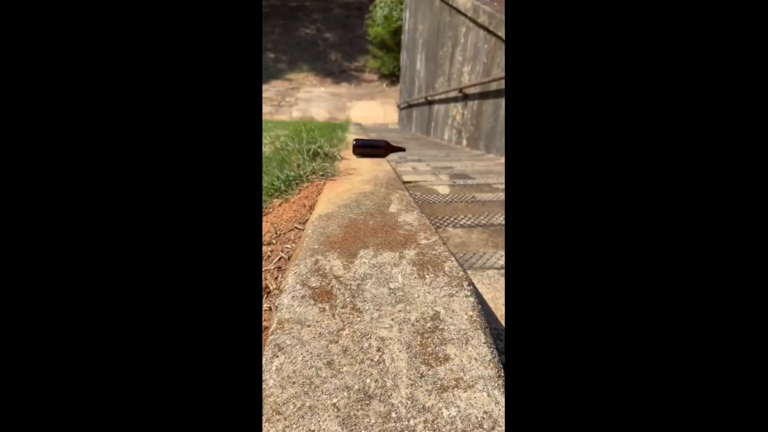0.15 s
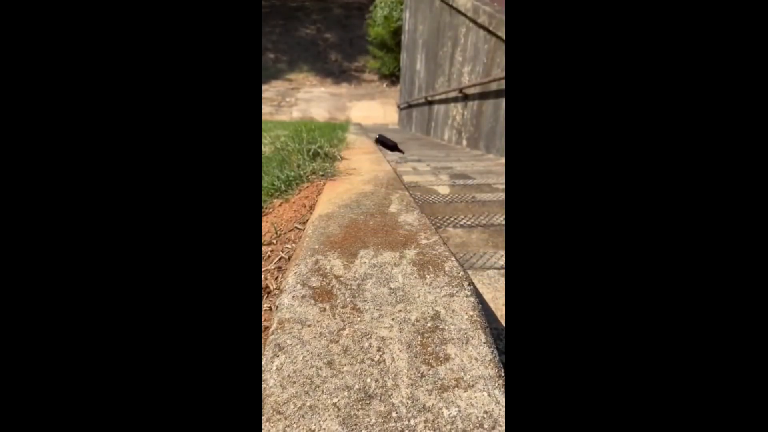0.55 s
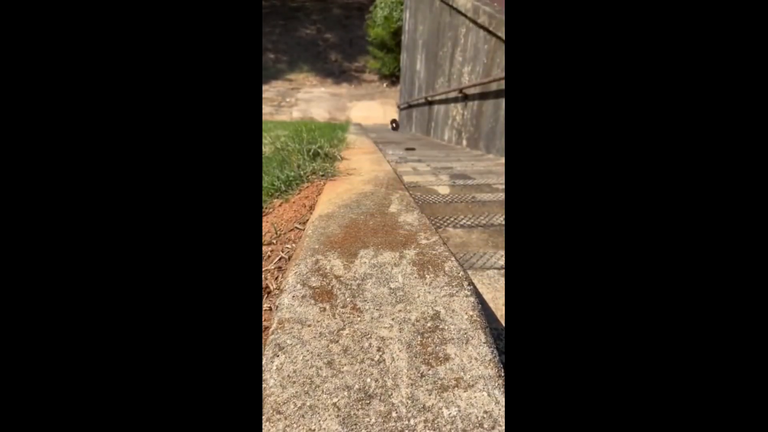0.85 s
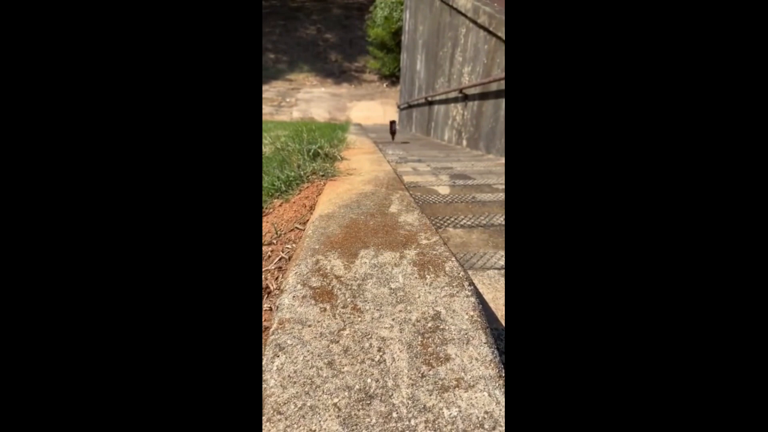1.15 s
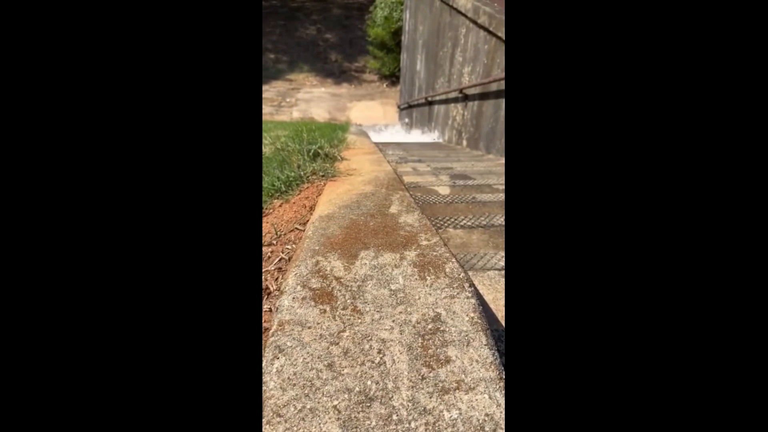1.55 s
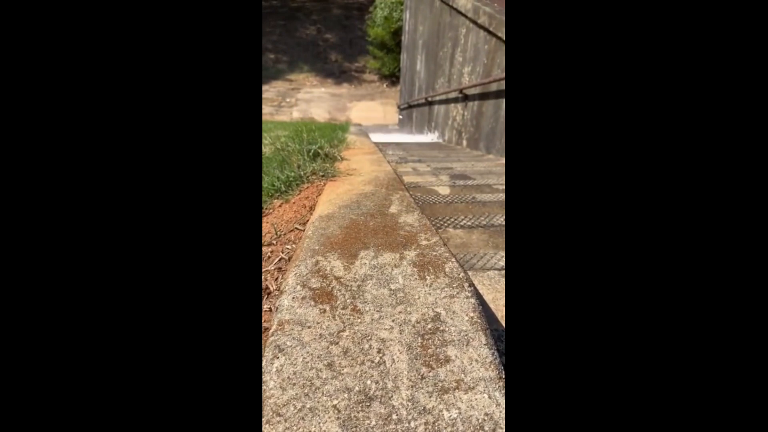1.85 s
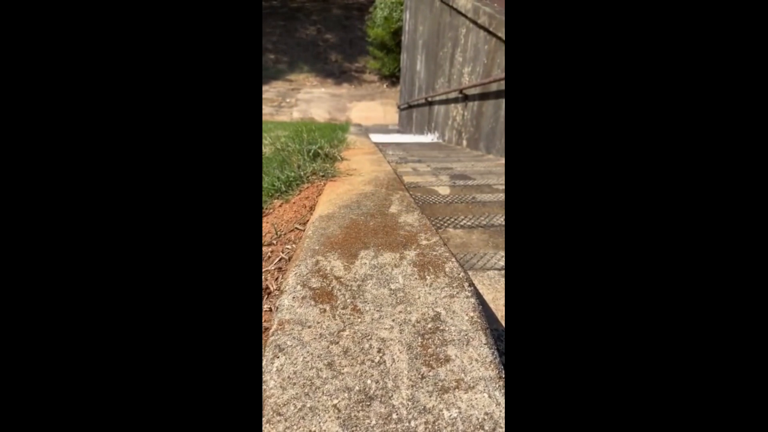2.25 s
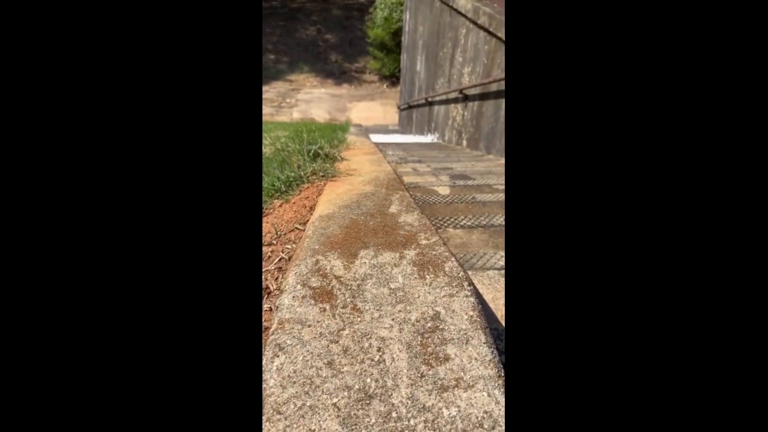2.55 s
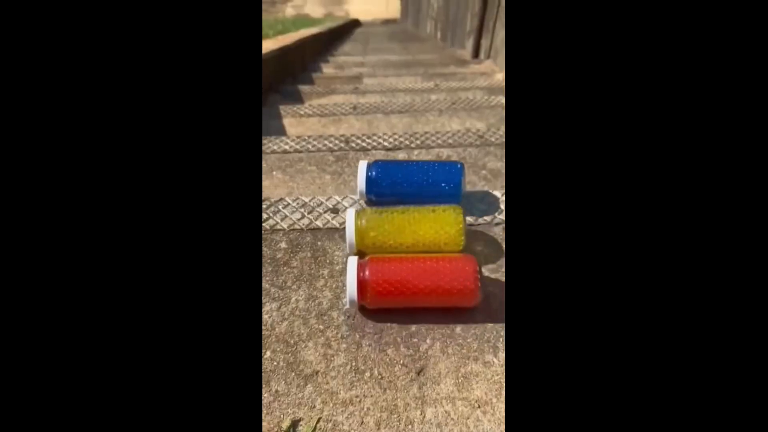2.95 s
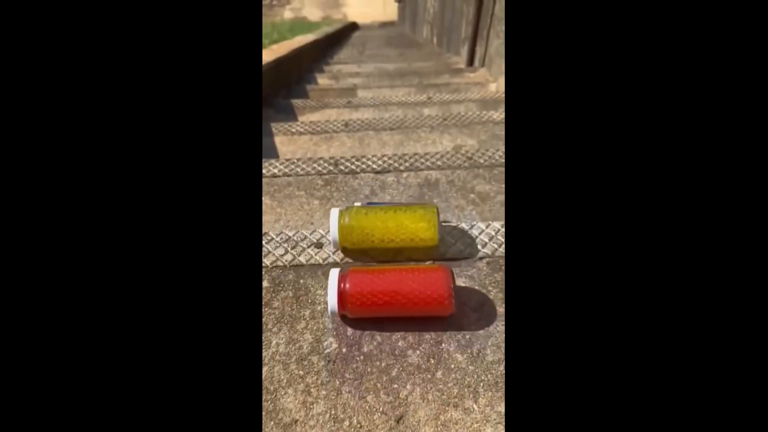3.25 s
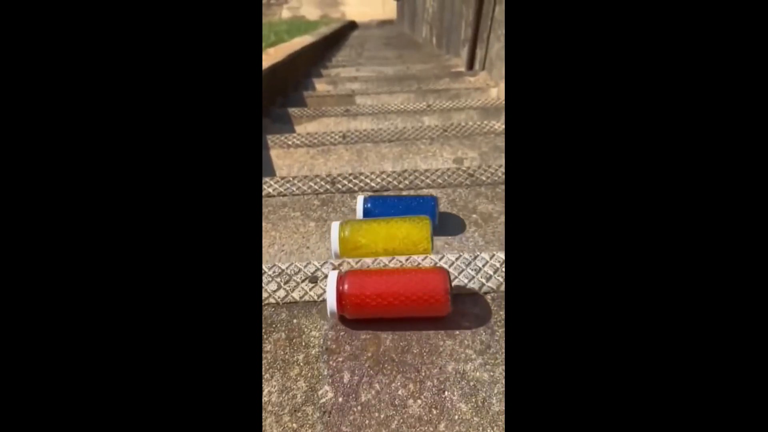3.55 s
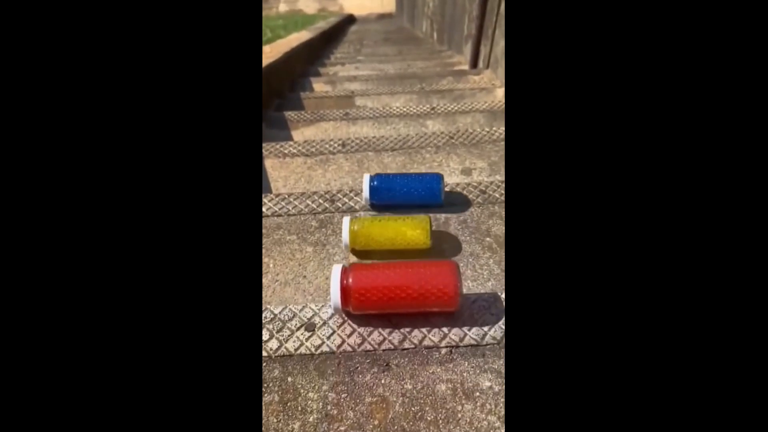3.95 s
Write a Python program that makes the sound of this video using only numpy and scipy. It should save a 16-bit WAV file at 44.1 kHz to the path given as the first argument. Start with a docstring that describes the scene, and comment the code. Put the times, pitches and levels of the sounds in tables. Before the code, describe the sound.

Mono, outdoors on concrete stairs, with a short diffuse echo, a faint hush and low lumpy rumble around the hits. From 0 to 0.45 s, the dull, faint tail of an earlier splash with a few glass ticks. At 0.55, 0.62 and 0.69 s a full glass bottle knocks on steps: muted, hollow tones around 400 Hz, roughened by sloshing. Near-quiet follows. At 1.17 s it bursts with a loud, clipped, low pop sinking in pitch and a noisy crack. Liquid spatters and splinters tick; glass clinks at 1.47 and 1.54 s, with a sharp piece at 2.05 s. From 2.1 to 2.65 s the thick base strikes repeatedly, ringing brightly around 1.2 kHz and above, swelling as it tumbles amid hissy skids. At 2.66 s heavy full jars abruptly begin rolling, a dry gritty rattle with knocks; hard clacking drops land around 3.18 and 3.6 s, a lighter one at 3.68, then rolling fades by 4.1 s.

```python
"""A full glass bottle bounces three times on concrete steps and bursts: damped modes, noise cracks, a sinking pop.
Liquid and shards scatter as dense grains and single rings; the thick base tumbles on, its modes swelling.
Full jars then roll over rough concrete and drop from step to step: random taps excite body and wall modes.
The last of an earlier splash opens the scene. A short diffuse echo, a faint hush and a low lumpy rumble
that swells around the hits lie behind. The sound is mono, with the same signal in both channels."""
import sys
import numpy as np
from scipy import signal
from scipy.fft import rfft, irfft
from scipy.io import wavfile
from scipy.ndimage import uniform_filter1d

SR = 44100
rng = np.random.default_rng(int(sys.argv[2]) if len(sys.argv) > 2 else 0)


def master_out(mix):
    """Clip the mix to full scale and print it as 16-bit PCM to the path in sys.argv[1]."""
    frames = np.transpose(np.atleast_2d(mix))
    ceiling = np.clip(frames, -1, 1)
    pcm = np.round(ceiling * 32767).astype(np.int16)
    wavfile.write(sys.argv[1], SR, pcm)


N = 180633

# single drops and splinters: start_s, peak_db, pitch_hz, t60_s, crack_db (relative to the peak)
SPLINTERS = [(0.0418, -29, 3270, 0.062, -10), (0.064, -21.5, 3880, 0.017, -7.5),
             (0.0914, -37.5, 1404, 0.071, -2), (0.1308, -27.5, 1630, 0.16, -30),
             (0.1431, -30, 4260, 0.031, -2), (0.1544, -35.5, 825, 0.22, -6), (0.1994, -39, 1282, 0.18, -17),
             (0.2289, -26.5, 1518, 0.1, -23), (0.2455, -33, 3600, 0.045, -20),
             (0.307, -40.5, 1450, 0.079, -23), (0.376, -41, 2860, 0.071, -26),
             (0.414, -38.5, 3940, 0.054, -22), (1.2313, -17.5, 3010, 0.044, 0.5),
             (1.2424, -20, 1057, 0.18, -24), (1.282, -24, 1730, 0.061, -17),
             (1.3602, -28, 1980, 0.041, -14), (1.3725, -20, 2044, 0.032, -26),
             (1.4248, -30, 1777, 0.22, -27), (1.4361, -24, 3500, 0.031, -23.5),
             (1.545, -20, 5990, 0.07, -11), (1.6558, -16, 2574, 0.04, -1), (1.6594, -15.5, 1146, 0.018, 4),
             (1.6785, -28, 6020, 0.049, 6), (1.7075, -21, 3570, 0.018, -5), (1.7434, -24, 1846, 0.036, 4),
             (1.7673, -25.5, 2470, 0.072, 1), (1.8178, -28, 1270, 0.03, 13), (1.8416, -31, 2570, 0.15, 11),
             (1.8704, -20.5, 7095, 0.047, 3.5), (1.979, -28, 1300, 0.045, 14.5),
             (1.9975, -31.5, 1113, 0.033, 6), (2.0098, -24, 2780, 0.082, 1),
             (2.0463, -2.5, 1520, 0.036, -8), (2.3594, -29.5, 1220, 0.074, 13.5),
             (2.425, -24, 6220, 0.05, -7.5)]


def amp(db):
    """Level law: 20 dB is a factor of ten in amplitude."""
    return 10 ** (np.asarray(db) / 20)


def evened(x):
    """Normalisation to unit effective (rms) value."""
    return x / np.sqrt(np.mean(x ** 2) + 1e-20)


def peaked(x):
    """Normalisation to unit peak."""
    return x / (abs(x).max() + 1e-20)


def add(mix, s, sound):
    """Superposition: a sound is summed into the mix from time s on."""
    part = mix[round(s * SR):][:len(sound)]
    part += sound[:len(part)]


def ring(modes, size=8000):
    """Modal decay: dying sines from (Hz, dB, t60 s) rows, each swelling over about its first cycle."""
    hz, db, t60 = np.transpose(modes)[:, :, None]
    t = np.arange(size) / SR
    decay = amp(db - 60 * t / t60)
    onset = np.minimum(hz * t * 0.89, 1)
    return (decay * np.sin(2 * np.pi * hz * t) * onset).sum(0)


def puff(t60, size=4000, rise=0.00079):
    """Broadband impact: noise with a linear rise and exponential decay, both in seconds."""
    t = np.arange(size) / SR
    return rng.standard_normal(size) * amp(-60 * t / t60) * np.minimum(t / rise, 1)


def colour(x, points):
    """Spectral shaping: a filter drawn through (Hz, dB) points on a logarithmic frequency axis."""
    f, db = np.transpose(points)
    bins_hz = np.fft.rfftfreq(len(x), 1 / SR)
    gain = amp(np.interp(np.log(bins_hz + 1), np.log(f + 1), db))
    return irfft(rfft(x) * gain, len(x))


def band(x, lo_hz, hi_hz):
    """Band limitation by a Butterworth filter."""
    return signal.sosfilt(signal.butter(2, [lo_hz, hi_hz], "bandpass", fs=SR, output="sos"), x)


def highpass(x, hz):
    """First-order loss of bass below a corner frequency."""
    return signal.sosfilt(signal.butter(1, hz, "highpass", fs=SR, output="sos"), x)


def follow(rows):
    """Level envelopes: gains over the whole scene from dB columns, -120 dB outside the rows."""
    s, *columns = np.transpose(rows)
    t = np.arange(N) / SR
    return [amp(np.interp(t, s, c, -120, -120)) for c in columns]


def dying(s, db, t60, rise):
    """Exponential decay: a gain over the whole scene that rises at s and dies away."""
    t = np.maximum(np.arange(N) / SR - s, 0)
    return amp(db - 60 * t / t60) * np.minimum(t / rise, 1)


def clicks(per_s, spread_db):
    """Random impulse train: sparse clicks of either sign, a few of them large."""
    sizes = amp(spread_db * np.minimum(rng.exponential(1, N), 5))
    return sizes * (rng.random(N) < per_s / SR) * rng.choice([-1, 1], N)


def flutter(size, span):
    """Low-frequency modulation: slow random wobble, rms about 1, from averages span samples long."""
    noise = rng.standard_normal(size + span)
    return evened(uniform_filter1d(uniform_filter1d(noise, span), span))[:size]


def bounces():
    """Impact excitation of damped modes: each bounce stops the old ringing of the full bottle.

    The sloshing inside roughens the tones and finally chokes them."""
    # the bottle meets a step: start_s, main_peak_db, upper_peak_db, crack_peak_db, thud_db, thud_hz,
    # thud_t60_s, damping_factor (divides t60 of the main tones)
    falls = [(0.547, -26, -30, -18, -24.5, 388, 0.071, 0.76),
             (0.618, -19, -30.5, -30, -27.5, 395, 0.26, 1.4), (.693, -25, -32, -32, -10.5, 606, 0.022, 1.7)]
    # main modes of the full bottle: pitch_hz, relative_db, t60_s (before damping)
    main_modes = [(430.5, -2.5, 0.64), (405, -3, 0.16), (325, -21, 0.58)]
    # upper modes of the full bottle: pitch_hz, relative_db, t60_s
    upper_modes = [(542, -8.5, 0.35), (650, -9.5, 0.25), (650, -9, .3), (704, -11.5, 0.36),
                   (750, -0.5, 0.6), (752, -7.5, 0.37), (807, -8.5, 0.72), (846, 1.5, 0.21),
                   (937, -2.5, 0.33)]
    out = np.zeros(N)
    stops = [row[0] for row in falls[1:]] + [1.0]
    for (s, main_db, upper_db, crack_db, thud_db, hz, thud_t60, damping), stop in zip(falls, stops):
        size = int((stop - s) * SR) + 300
        fade = np.clip((size - np.arange(size)) / (0.3 * size), 0, 1)
        main = peaked(ring([(f, db, t60 / damping) for f, db, t60 in main_modes], size=size))
        rough_main = main * (1 + 0.35 * flutter(size, span=600))
        upper = sum(ring([mode], size=size) * (0.94 + flutter(size, span=400)) for mode in upper_modes)
        add(out, s, fade * (amp(main_db) * rough_main + amp(upper_db) * peaked(upper)))
        add(out, s, amp(thud_db) * ring([(hz, 0, thud_t60), (hz * 0.68, -12, thud_t60)]))
        crack = puff(0.041, size=9000, rise=0.0031)
        crack += 0.087 * puff(0.28, size=9000, rise=0.0062)  # the slow part comes back off the stairs
        add(out, s, amp(crack_db) * peaked(band(crack, 610, 3000)))
    return out


def burst():
    """Sudden release and overload: the walls give way, the liquid pops out and the peaks are clipped."""
    # modes of the ringing broken halves: pitch_hz, relative_db, t60_s
    half_modes = [(436, 4.5, 0.17), (525.4, -3.5, 0.083), (680, 4.5, 0.076), (706, -2, .06),
                  (319, -4, 0.17)]
    pop_s, hold_s = 1.1704, 0.0236
    # levels ahead of the clipping
    pop_db, sag_db, tail_db, tail_t60_s = -1, -6.5, -16, 0.11
    from_hz, to_hz, sink_s = 325, 188.3, 0.0201
    halves_db, crack_peak_db, clip_level = -7.5, -10, 0.4
    t, out = np.arange(8000) / SR, np.zeros(N)
    pitch_hz = to_hz + (from_hz - to_hz) * np.exp(-t / sink_s)
    turns = np.cumsum(pitch_hz) / SR
    # full for a moment, then a weak tail
    full = amp(pop_db + sag_db * t / hold_s) * np.clip((hold_s - t) / 0.0013, 0, 1)
    tail = amp(tail_db - 60 * (t - hold_s) / tail_t60_s)
    add(out, pop_s, -np.maximum(full, tail) * np.sin(2 * np.pi * turns))
    halves = sum(ring([mode], size=12000) * (1.04 + flutter(12000, span=300)) for mode in half_modes)
    add(out, pop_s + 0.00605, amp(halves_db) * peaked(halves))
    out = np.clip(out, -clip_level, clip_level)  # the microphone overloads
    add(out, pop_s, amp(crack_peak_db) * peaked(band(puff(.1, size=8000), 510, 3700)))
    return highpass(out, 60)


def scatter():
    """Granular superposition: short grains, sharp ticks and tiny ringing chips over hiss; drops glide up."""
    # spectrum of the debris: frequency_hz, relative_db
    spray = [(120, -59.5), (200, -29.5), (353, -3), (440, -26), (696, -9.5), (933, -14), (1320, -5.5),
             (1710, -9), (2650, -5.5), (5420, -5), (6880, -1.5), (12600, 4), (16000, -41.5)]
    t = np.arange(3000) / SR
    grains = 1.4 * rng.standard_normal(N)
    grains += 1.2 * evened(clicks(900, spread_db=3.0))
    for hz in np.geomspace(400, 9000, num=30):
        turns = hz * t * (1 + 2.6 * t)  # rising pitch
        grain = np.sin(2 * np.pi * turns) * np.exp(-turns / rng.uniform(3.9, 14))
        grain *= 1 - np.exp(-turns / 0.28)
        grains += 0.39 * evened(signal.oaconvolve(clicks(60 + hz / 15, spread_db=4.5), grain)[:N])
        chip = ring([(hz * rng.uniform(0.94, 1.05), 0, .09)], size=3000)
        grains += 0.18 * evened(signal.oaconvolve(clicks(18, spread_db=5.5), chip)[:N])
    grains = colour(grains, spray)
    early = np.arange(N) < .5 * SR  # the first splash is farther off and duller
    grains = np.where(early, evened(band(grains, 600, 6500)), evened(grains))
    mid = evened(band(grains, 1010, 4800))
    top = evened(band(grains, 7900, 21800))
    low = evened(band(grains, 250, 1580))
    return spill(mid, top, low)


def spill(mid, top, low):
    """Envelope control: three bands of debris follow a slow level, with a shower after every splinter."""
    # two lists, the old splash and the burst bottle: start_s, level_db, treble_db (relative to the middle band)
    courses = [
        [(0.0, -43, -6), (0.05, -49.5, -10), (0.12, -49.5, -9), (0.26, -52.5, -10), (0.28, -70, -12),
         (0.35, -77.5, -11), (0.42, -58, -8), (0.47, -83.5, -7)],
        [(1.175, -23.5, -6.5), (1.21, -34.5, -21), (1.245, -31, -21), (1.28, -37.5, -8.5), (1.37, -35, -15.5),
         (1.41, -48.5, -15), (1.44, -29, -22), (1.62, -34, -6.5), (1.7, -37, -15), (1.86, -39.5, -8.5),
         (1.92, -36, -2), (1.965, -46.5, -17), (1.985, -43.5, 8.5), (2.085, -42, -22), (2.11, -27, -2.5),
         (2.28, -43, -2.5), (2.42, -37.5, -7.5), (2.54, -42, -7), (2.68, -38.5, -11)],
    ]
    low_shares_db = -3.5, -14.5  # one for each list, relative to the middle band
    shower_db, shower_t60_s, shower_rise_s = -17, 0.091, 0.0033  # dB relative to the splinter's peak
    showers = sum(dying(s, db + shower_db, shower_t60_s, shower_rise_s) for s, db, *_ in SPLINTERS)
    out = np.zeros(N)
    for rows, low_db in zip(courses, low_shares_db):
        level, treble = follow(rows)
        inside = treble > 1e-5  # showers sound only within the span of the rows
        out += (level + showers * inside) * (mid + treble * top + amp(low_db) * low)
    return out


def splinters():
    """Fragment impacts: each piece cracks and rings roughly around its pitch, as several pieces jostle.

    Dull lumps land as two damped modes; skids are banded noise."""
    # dull lumps landing: start_s, level_db, pitch_hz, t60_s
    lumps = [(1.349, -23, 237, 0.067), (1.468, -27.5, 500, 0.031), (1.657, -17.5, 242, 0.023),
             (1.914, -35.5, 356, 0.047)]
    # glass skids over grit and excites a dense cluster of modes:
    # start_s, rise_s, t60_s, peak_db, centre_hz, width_hz
    skids = [(1.867, 0.0017, 0.14, -18, 6880, 1210), (2.1, 0.0057, 0.24, -17, 7560, 1500),
             (2.131, 0.043, 0.18, -13, 8280, 800), (2.31, .025, 0.14, -29.5, 8100, 1196),
             (2.459, 0.017, 0.41, -16.5, 7100, 1800), (2.549, 0.027, 0.12, -10, 8060, 1100)]
    out = np.zeros(N)
    for s, db, hz, t60, crack_db in SPLINTERS:
        tone = ring([(hz, 0, t60), (hz * 1.9, -8, t60 * 1.1)], size=4000)
        tone = tone * (1.0 + flutter(4000, span=90))
        add(out, s, amp(db) * peaked(tone))
        spikes = amp(5.7 * rng.exponential(1, 4000).clip(0, 4))
        crack = band(puff(1.5 * t60) * spikes, 1100, 10000)
        add(out, s, amp(db + crack_db) * peaked(crack))
    for s, db, hz, t60 in lumps:
        add(out, s, amp(db) * ring([(hz, 0, t60), (hz * 2.4, -6, t60 * 0.44)]))
    for s, rise, t60, db, hz, width_hz in skids:
        edge = hz - width_hz / 2, hz + width_hz / 2
        skid = band(band(puff(t60, size=9000, rise=rise), *edge), *edge)
        add(out, s, amp(db) * peaked(skid))
    return out


def base():
    """Modal excitation and directivity: a blow stops the old ringing and starts a new one; tumbling fades modes."""
    # blows; the struck place sets six groups of modes:
    # start_s, crack_peak_db, group_1_db to group_6_db, damping_factor (divides t60)
    blows = [(1.4677, -16.5, -20, -17.5, -24, -14.5, -21.5, -44, 4.65),
             (1.544, -19.5, -19, -14.5, -25.5, -23, -24, -47, 2.4),
             (1.554, -23.5, -32, -24, -31.5, -25, -32, -52, 2.05),
             (2.0995, -13, -12, -15, -19.5, -30, -14.5, -22, 3.1),
             (2.1192, -13.5, -25.5, -31, -18, -34.5, -17.5, -34.5, 0.91),
             (2.2938, -12.5, -18.5, -26, -18.5, -25, -15.5, -22.5, 0.9),
             (2.4432, -12.5, -20, -16.5, -11.5, -41.5, -20.5, -24, 1.6),
             (2.4813, -16, -28, -27, -25.5, -35.5, -17, -29.5, 0.82),
             (2.5524, -19.5, -34.5, -28, -28, -28.5, -19.5, -21.5, 1.26),
             (2.577, -28, -37.5, -31, -46.5, -25, -20.5, -38, 1.17)]
    # modes of the base: pitch_hz, relative_db (added to the group's), t60_s (before damping)
    base_modes = [(1235.6, 0, 1), (2325, 3.5, 0.41), (2709, -0.5, 0.3), (4014, 3.5, 0.15), (4756, -2, 0.17),
                  (5150, -8, 0.16), (6650, -6, 0.23), (6790, 3.5, 0.089), (7510, -7.5, .2),
                  (7500, -7, 0.06), (8280, -4, 0.14), (7920, -1.5, 0.082), (10170, -15, 0.61),
                  (10700, -7, 0.19), (11500, -18.5, .1), (12350, -14.5, 0.3)]
    groups = [0, 1, 2, 3, 4, 4] + [5] * 10  # the group of each mode
    parts, cracks = np.zeros((6, N)), np.zeros(N)
    stops = [row[0] for row in blows[1:]] + [9]
    for (s, crack_db, *group_db, damping), stop in zip(blows, stops):
        size = int(min(stop - s, .3) * SR) + 100
        for (hz, db, t60), group in zip(base_modes, groups):
            tone = ring([(hz, db + group_db[group], t60 / damping)], size=size)
            depth_db = 2.5 + hz / 2200  # high modes beam narrowly
            turning = amp(depth_db * np.clip(flutter(size, span=500), -2, 1))
            add(parts[group], s, tone * turning * signal.windows.tukey(size, 240 / size))
        add(cracks, s, amp(crack_db) * peaked(band(puff(0.067, rise=0.0046), 600, 9400)))
    first, second = tumble()
    return first * parts[0] + second * (parts[1] + parts[2]) + parts[3:].sum(0) + cracks


def tumble():
    """Rotating directivity: the lowest mode swells between edge-on moments.

    The next two modes swell slightly earlier and less deeply."""
    # the face of the base is edge-on: start_s, swell_db (of the swell that follows)
    edge_on = [(1.44, 3), (1.529, -6), (1.6, -19), (2.04, -3.5), (2.117, -1), (2.2, 2.5), (2.354, 6.5),
               (2.434, 7.5), (2.577, 7)]
    stops_s, edge_leak, swell_shape = 2.68, 0.25, 0.95
    side_depth, side_peak = 0.15, 0.42  # peak position in half turns after edge-on
    s, db = np.transpose(edge_on)
    t = np.arange(N) / SR
    # the tiny offset keeps the last index inside the table
    half_turns = np.interp(t, [*s, stops_s], np.arange(len(s) + 1) - 1e-9) + 1e-9 * (t < stops_s)
    sounding = np.clip((stops_s - t) / .012, 0, 1)
    swell = abs(np.sin(np.pi * half_turns)) ** swell_shape
    face = amp(db)[half_turns.astype(int)] * swell + edge_leak
    side = 1 + side_depth * np.cos(2 * np.pi * (half_turns - side_peak))
    return face * sounding, side * sounding


def jar_body(hz):
    """Scaled modal series: the body modes of a full jar keep fixed ratios to its pitch."""
    # body modes: pitch_factor, relative_db, t60_s
    body_modes = [(0.98, 23, 0.0096), (0.39, -5, 0.022), (2.1, -9.5, 0.026), (.38, -16.5, 0.053)]
    return ring([(factor * hz, db, t60) for factor, db, t60 in body_modes], size=2500)


def jars():
    """Rolling and impact excitation: grit and bumps tap body and wall modes of the jars.

    The body pitch drifts as the contents shift."""
    # rolling: start_s, level_db (before the clumping of the grit), pitch_hz
    roll = [(2.66, -33, 1250), (2.76, -47, 1120), (2.885, -41, 970), (2.93, -51.5, 1030),
            (3.045, -44, 1246), (3.09, -45.5, 964), (3.14, -57, 1110), (3.23, -52.5, 1080),
            (3.285, -42, 1010), (3.335, -52.5, 920), (3.384, -50.5, 1210), (3.48, -47.5, 1080),
            (3.54, -44.5, 1320), (3.59, -57, 1130), (3.65, -44.5, 1250), (3.7, -44, 1350),
            (3.769, -62, 960), (3.816, -48, 1010), (3.97, -56, 783), (4.046, -55, 710), (4.096, -64.5, 800)]
    # modes of the glass wall: pitch_hz, relative_db, t60_s
    wall_modes = [(2725, 7.5, 0.029), (3440, -35, 0.011), (4340, 3.5, 0.02), (4960, -13, 0.00985),
                  (6970, 5.5, 0.0069), (8700, 1, 0.0041), (12630, 0.5, 0.0051)]
    # a jar meets a ridge or a step: start_s, body_peak_db, pitch_hz, bright_db (relative), rattle_t60_s
    bumps = [(2.662, -18, 1265, -22, 0.041), (2.697, -24, 1360, -13, 0.0056),
             (2.735, -31.5, 1240, -26, 0.0093), (2.773, -22, 1280, -40, 0.045),
             (2.797, -27.5, 860, -27, 0.061), (2.824, -26, 1264, -17, 0.062), (2.88, -30, 910, -10.5, 0.02),
             (2.941, -32.5, 1150, -12.5, 0.1), (2.995, -35, 1150, -0.5, 0.062),
             (3.028, -22, 1376, -24, 0.059), (3.037, -33, 790, -24.5, 0.048), (3.069, -28, 1110, -6, 0.015),
             (3.094, -26, 1120, -25, 0.01), (3.109, -34, 1060, -35, 0.017),
             (3.148, -27.5, 1040, -11, 0.078), (3.173, -13, 1045, -22, 0.015),
             (3.181, -15.5, 1384, -2, 0.031), (3.185, -8, 1520, -9.5, 0.011), (3.248, -36, 800, -8, 0.016),
             (3.281, -29, 1650, 2, 0.051), (3.327, -36.5, 890, -11, 0.028), (3.393, -37, 1500, -30, 0.019),
             (3.436, -34.5, 1184, -25, 0.019), (3.455, -34.5, 990, -9, 0.025),
             (3.53, -30.5, 1310, -10, 0.069), (3.542, -29, 1520, -5, 0.043), (3.567, -34, 1135, -10, 0.033),
             (3.598, -9.5, 1620, -2, 0.024), (3.603, -9.5, 1500, 0.5, 0.016),
             (3.61, -14.5, 1120, 0.5, 0.015), (3.67, -33, 1010, -3, 0.034),
             (3.683, -19, 1377, -12.5, 0.032), (3.694, -23.5, 1480, -15, 0.024),
             (3.823, -35, 1526, -19, 0.016)]
    # every bump shakes the step: pitch_hz, level_db (relative to the bump), t60_s
    step_modes = [(59, -24.5, 0.062), (194, -26, 0.038), (395, -21, 0.046)]
    bright_share_db, quiet_brighter = -11.5, 0.16  # wall share at -46 dB; its gain per dB the rumble drops
    clump_depth_db = 2.5  # grit lies in clumps
    # crack levels relative to the bump: light bumps, and drops whose body peaks above drop_from_db
    ridge_crack_db, drop_crack_db, drop_from_db = -13.5, -4, -12
    wall = ring(wall_modes, size=2000)
    grit = clicks(1600, spread_db=2.5) + 0.21 * rng.standard_normal(N)
    pitches = np.geomspace(600, 1700, num=8)
    rumbles = [evened(signal.oaconvolve(clicks(350, spread_db=4.0), jar_body(hz))[:N]) for hz in pitches]
    wall_hiss = evened(signal.oaconvolve(grit, wall)[:N])
    grit_hiss = evened(band(band(grit, 2200, 6600), 2200, 5900))
    sizzle = evened(wall_hiss + 0.25 * grit_hiss)
    s, db, hz = np.transpose(roll)
    level, bright = follow(np.transpose([s, db, bright_share_db - quiet_brighter * (db + 46)]))
    # crossfade between rumbles of fixed pitch to follow the drift
    pitch_now = np.interp(np.arange(N) / SR, s, hz)
    near = np.exp(-(np.log(pitch_now / pitches[:, None]) / 0.51) ** 2)
    rumble = (near * rumbles).sum(0) / np.sqrt((near ** 2).sum(0) + 1e-9)
    clumps_db = clump_depth_db * flutter(N, span=350)
    out = level * (amp(clumps_db) * rumble + amp(0.75 * clumps_db) * bright * sizzle)
    for s, db, hz, bright_db, rattle_t60 in bumps:
        taps = puff(rattle_t60, size=2500, rise=0.0011) * (rng.random(2500) < .15)
        dull = peaked(signal.oaconvolve(taps, jar_body(hz))[:4000])
        sharp = peaked(signal.oaconvolve(taps, wall)[:4000])
        crack = peaked(band(band(puff(rattle_t60 * 3.35), 430, 3850), 180, 11100))
        crack_db = np.interp(db, [drop_from_db - 2.5, drop_from_db], [ridge_crack_db, drop_crack_db])
        add(out, s, amp(db) * (dull + amp(bright_db) * sharp + amp(crack_db) * crack))
        add(out, s, amp(db) * ring(step_modes))
    return out


def echo(x):
    """Diffuse reverberation off wall and steps: a noise tail, each band dying at its own speed."""
    # decay of the tail: frequency_hz, t60_s
    wall_decay = [(200, 0.47), (1000, 0.14), (4000, 0.093), (12000, 0.025)]
    hz, t, z = signal.stft(rng.standard_normal(SR // 2), SR, nperseg=256)
    f, t60 = np.transpose(wall_decay)
    decay = amp(-60 * t / np.interp(hz, f, t60)[:, None])
    tail = signal.istft(z * decay, SR, nperseg=256)[1]
    return signal.oaconvolve(x, tail / np.linalg.norm(tail))[:N]


def air():
    """Filtered noise: a faint outdoor hush, and a low lumpy rumble that swells around the hits."""
    # spectrum of the hush: frequency_hz, relative_db
    hush_spectrum = [(20, -9.5), (120, -15.5), (240, -18), (700, -27.5), (2000, -42), (6000, -39),
                     (12000, -46.5), (16000, -62.5)]
    # swells of the low rumble: start_s, level_db
    swells = [(0.0, -62), (0.5, -66.5), (0.66, -43), (0.8, -68), (1.1, -72), (1.3, -59), (1.72, -63),
              (1.9, -66.5), (2.3, -55), (2.8, -78.5), (4.09, -86.5)]
    hush = amp(-70) * evened(colour(rng.standard_normal(N), hush_spectrum))
    rumble = band(band(rng.standard_normal(N), 22, 110), 25, 190)
    lumpy = rumble * amp(3. * flutter(N, span=2500))
    return hush + follow(swells)[0] * evened(lumpy)


def scene():
    """Superposition of all sources with their echo and the air."""
    hits = scatter() + splinters() + bounces() + base() + jars()
    hits = highpass(hits, 150)  # small objects radiate little bass
    hits = hits + burst()
    mono = hits + amp(-22.5) * echo(hits) + air()
    return np.array([mono, mono])


def record(dry):
    """Band limitation: a linear-phase low-pass at 16.7 kHz."""
    lowpass = signal.firwin(511, 16700, window=("kaiser", 9), fs=SR)
    return signal.oaconvolve(dry, lowpass[None], "same")


dry = scene()
out = record(dry)
master_out(out)
```